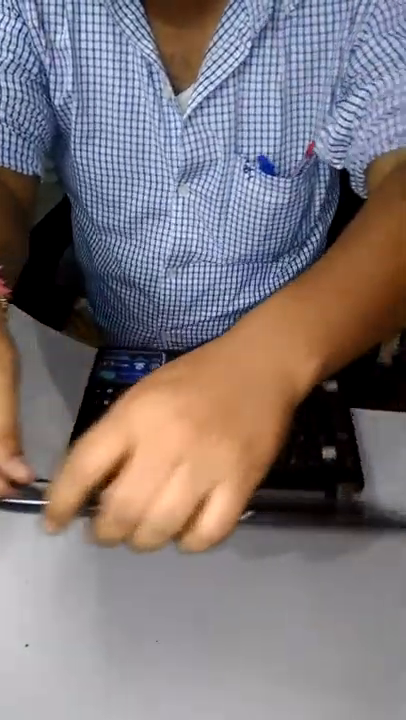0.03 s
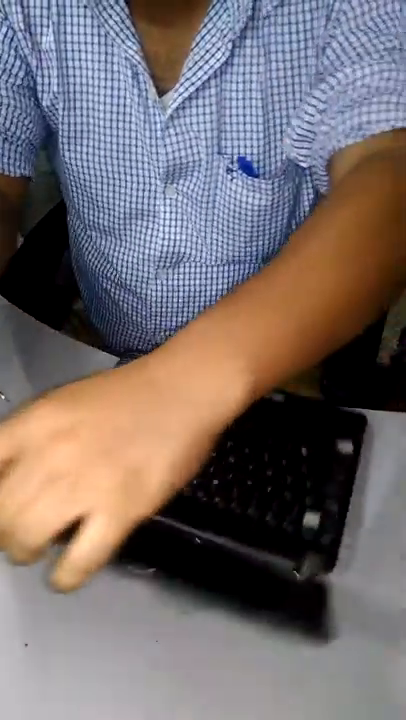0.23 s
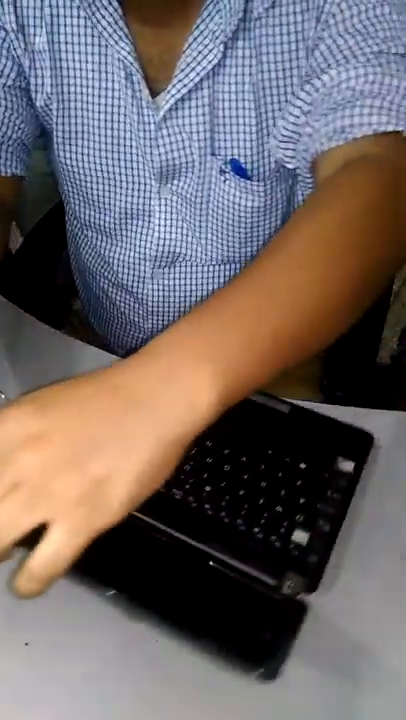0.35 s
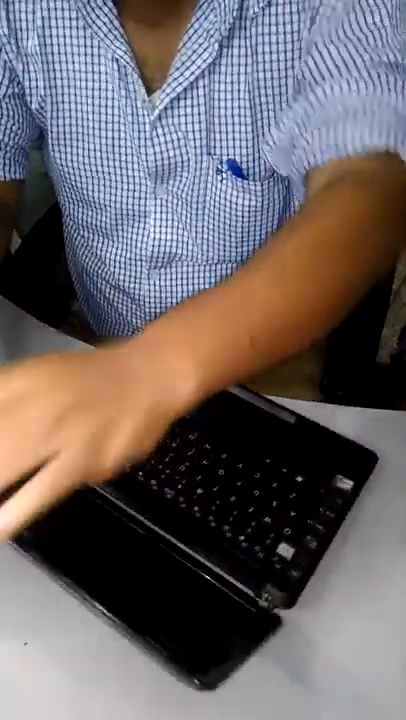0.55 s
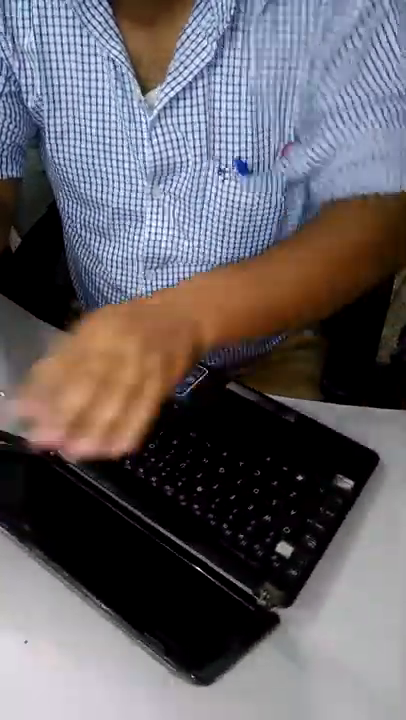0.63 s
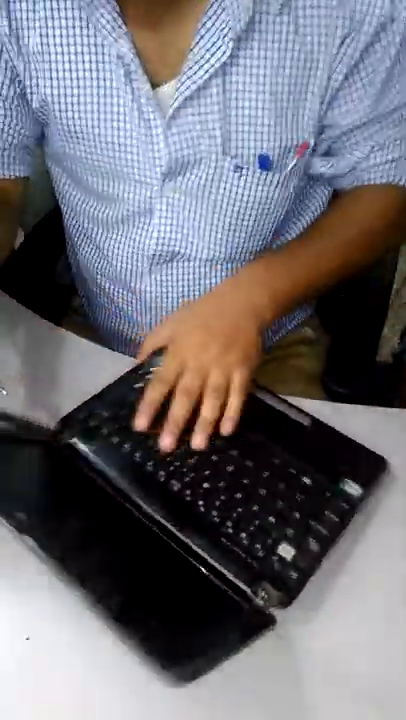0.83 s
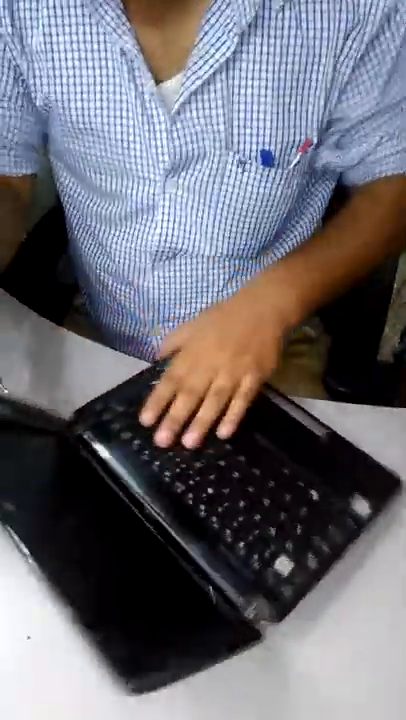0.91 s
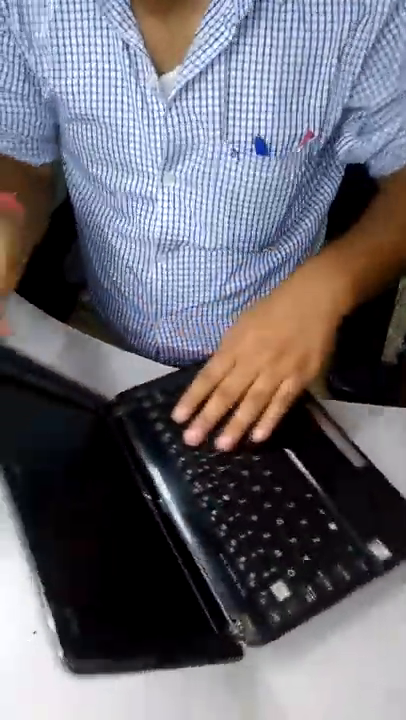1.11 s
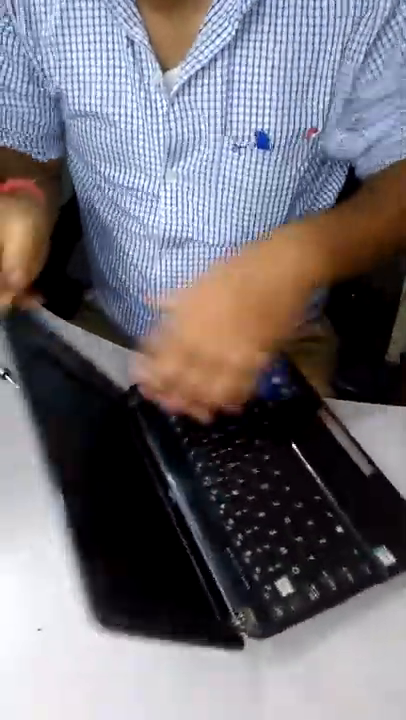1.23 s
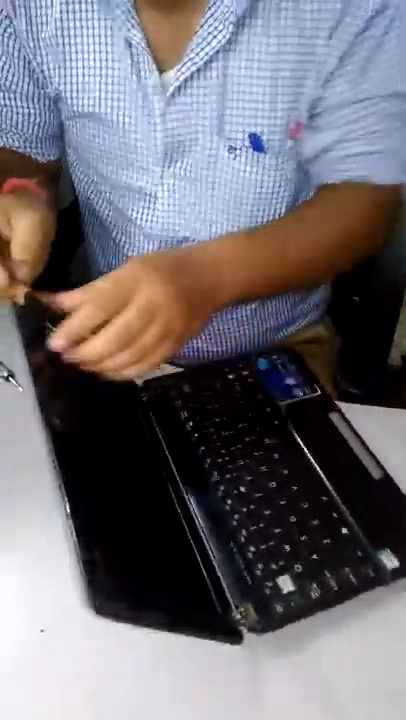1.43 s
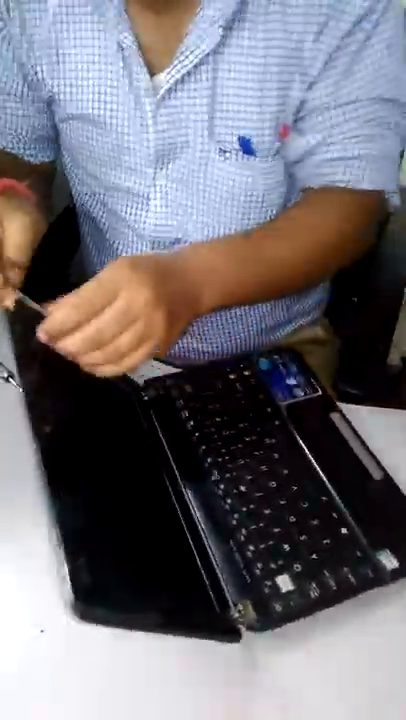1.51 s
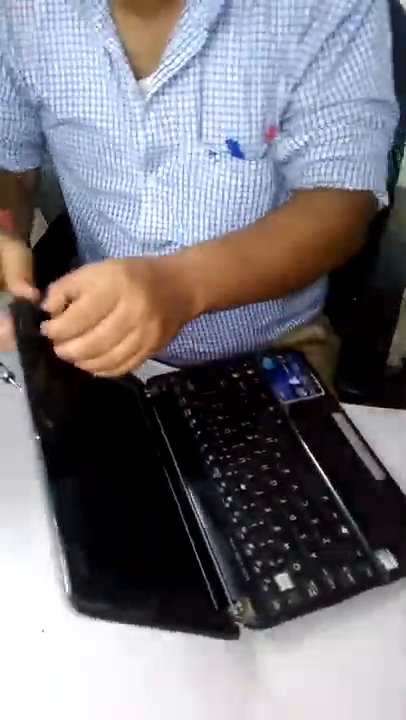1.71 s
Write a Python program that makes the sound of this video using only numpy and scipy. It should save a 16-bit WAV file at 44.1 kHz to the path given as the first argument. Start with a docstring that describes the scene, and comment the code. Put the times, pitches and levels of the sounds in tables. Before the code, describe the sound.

Sharp plastic knocks and soft scraping as a small laptop is shifted on a table.

```python
"""A small laptop is turned on a table, over a low room rumble and a faint hum. Palms rub the lid and brush
the keys, then at 0.28 s the front corner knocks down, rocks and lands again 30 ms later: the plastic case
rings, the keys clatter and the table top booms. The base drags on its rubber feet and bumps softly. From
0.9 s the hand rubs, brushes and ticks on the plastic, and the hinge gives a faint squeak. At 1.38 s the
rear corner knocks and rocks in the same way, and a last drag and brush die away."""
import sys
import numpy as np
from scipy import signal
from scipy.fft import rfft, irfft
from scipy.io import wavfile

SR = 44100
rng = np.random.default_rng(int(sys.argv[2]) if len(sys.argv) > 2 else 0)


def persist_wave(psi):
    """Save psi, clipped to +-1, as 16-bit WAV."""
    counts = np.round(np.clip(psi, -1, 1) * 32767).astype(np.int16)
    wavfile.write(sys.argv[1], SR, np.atleast_2d(counts).T)


N = 77175

# hits of the case on the table: start_s, corner, level_db, cutoff_hz, body_db, clatter_db
KNOCKS = [(0.278, "front", -4.5, 1400, -14, -5), (0.2795, "front", -16, 9950, -5.5, 7),
          (0.2836, "front", -20, 9000, 7.5, 4), (0.3100, "front", -20.5, 3630, 9.5, 6.5),
          (1.377, "rear", -14, 7540, -1, 2), (1.3820, "rear", -20, 6600, 2, 2),
          (1.406, "rear", -18, 3460, -4, 2.5)]
CORNERS = ("front", "rear")
# ring of the plastic case: pitch_hz, t60_s, front_hit_db, rear_hit_db
CASE_MODES = [(754, 0.05, -4.5, -7), (882, .06, -11, -3), (981, .06, -8, 1), (1187, 0.067, 4, -9),
              (1300, 0.065, 0.5, 0.5), (1368, 0.13, -11.5, -12), (1642, 0.05, -10, -31),
              (2090, 0.053, -12, -2), (2444, 0.072, -9, -23), (2458, .07, -22, 0), (2540, 0.055, -10.5, -3),
              (3083, .08, -8, -4.5), (3750, 0.15, -8, -32), (5070, .06, -20, -7)]
# hollow body of the base: pitch_hz, level_db, t60_s
BODY_MODES = [(137.6, 0, 0.085), (194.6, -0.5, 0.077), (270.5, -2, 0.12), (343, -2, 0.096),
              (420.5, -7.5, 0.2)]
# EQ of the clattering keys and panels: frequency_hz, front_hit_db, rear_hit_db
CLATTER_EQ = [(100, 1, -23), (400, -0.5, 4.5), (536, -4.5, -2.5), (820, -0.5, 3.5), (1320, 1.5, -1),
              (1670, -3, -1), (2500, -3.5, -4), (3100, -11.5, 1), (3350, -8, -11), (4050, -14, -8),
              (5500, -19, -11), (6820, -21.5, -15.5), (8500, -30.5, -23), (14000, -27, -19)]
# weight landing on the table: start_s, level_db, push_s
THUMPS = [(0.053, -35, 0.0028), (0.24, -20, 0.0028), (0.28, -14.5, 0.0053), (0.3093, -8.5, 0.0074),
          (0.395, -21.5, 0.0028), (0.534, -16, 0.0054), (0.612, -21, 0.0083), (0.768, -27.5, 0.0034),
          (0.843, -17, 0.0095), (0.986, -28, 0.0022), (1.148, -24, 0.0034), (1.371, -12.5, 0.01),
          (1.402, -19, 0.0099)]
# boom of the table top: pitch_hz, level_db, t60_s
TABLE_MODES = [(66.6, -3, .28), (90.3, -1.5, 0.18), (128.1, -2, 0.18), (182, -20, 0.073)]
# the base dragging on the table: start_s, length_s, level_db, pitch_hz
DRAGS = [(0.322, 0.27, -33.5, 352.7), (0.37, 0.11, -36, 429), (0.485, 0.13, -43, 399),
         (0.495, 0.15, -35, 182), (0.558, 0.23, -40.5, 504.5), (0.717, 0.3, -44, 275),
         (1.059, .14, -41, 344), (1.395, 0.12, -33, 406.5), (1.598, 0.093, -50.5, 503)]
# EQ of the scraping feet: frequency_hz, gain_db
SCRAPE_EQ = [(150, -13), (270, -2.5), (500, 15), (640, -14.5), (1200, -7), (2500, -8), (6000, -25)]
# fingertips and nails on the plastic: start_s, level_db
TICKS = [(0.99, -51), (1.3273, -55)]
# bright EQ of a tick: frequency_hz, gain_db
TICK_EQ = [(1500, -6), (3000, 0), (7000, 1), (10000, -5.5), (14000, -17)]
# hand and sleeve brushing the keys: start_s, length_s, level_db
BRUSHES = [(0.13, 0.42, -56.5), (0.92, 0.071, -57.5), (0.97, 0.094, -59.5), (1.03, 0.12, -62),
           (1.32, 0.068, -56.5), (1.45, .17, -58)]
# papery EQ of the brushing: frequency_hz, gain_db
BRUSH_EQ = [(1500, -7), (3000, 18.5), (5000, -2.5), (8000, 1.5), (11000, -9.5), (14000, -11.5)]
# palms rubbing the lid: start_s, length_s, level_db
RUBS = [(0.001, 0.091, -49), (0.1, 0.23, -47.5), (0.93, 0.3, -56)]
# duller EQ of the rubbing: frequency_hz, gain_db
RUB_EQ = [(300, -5), (900, 2), (1800, 4), (3600, -8.5), (5500, -21), (10000, -35.5)]
# squeak of the hinge: start_s, length_s, level_db
SQUEAKS = [(1.272, 0.051, -51)]
# dark EQ of the room rumble: frequency_hz, gain_db
RUMBLE_EQ = [(20, -28), (35, -9), (55, -6), (115, -1), (200, -9), (350, -11.5), (500, -13), (620, -24.5),
             (850, -22.5), (1010, -17.5), (1250, -27.5), (2100, -30.5), (3100, -39), (4200, -46),
             (5800, -57.5), (9000, -64.5), (14000, -77.5)]

CASE_DB, BODY_DB, CLATTER_DB = -9.5, -5.5, -5.5
CLATTER_T60_S, ATTACK_S, TICK_T60_S = 0.1, 0.00076, 0.046
DRAG_WIDTH_HZ, SLIPS_PER_S, SLIP_CUTOFF_HZ, SCRAPE_DB = 14, 2500, 900, -12.5
SQUEAK_HZ, SQUEAK_WIDTH_HZ = 2735, 66
ROOM_DB, ROOM_T60_LOW_S, ROOM_T60_HIGH_S, ROOM_SPLIT_HZ, ROOM_BUILD_S = -12.5, 0.48, 0.32, 4900, 0.012
RUMBLE_DB, HUM_HZ, HUM_DB = -33, 123.6, -43
BASS_CUT_HZ, TOP_CUT_HZ = 35, 14400


def undb(db):
    """Decibels to gain."""
    return 10 ** (np.asarray(db) / 20)


def clock():
    """Time of every sample in seconds."""
    return np.arange(N) / SR


def equalise(x, eq):
    """Shape a sound with an EQ curve; rms 1."""
    hz, db = np.array(eq, float).T
    bins_hz = np.maximum(np.fft.rfftfreq(N, 1 / SR), 1)
    gain = undb(np.interp(np.log(bins_hz), np.log(hz), db))
    shaped = irfft(rfft(x) * gain, N)
    return shaped / np.std(shaped)


def noise(eq):
    """Noise coloured by an EQ curve; rms 1."""
    return equalise(rng.standard_normal(N), eq)


def lowpass(x, hz):
    """Second-order low-pass."""
    return signal.sosfilt(signal.butter(2, min(hz, SR / 2 - 1), fs=SR, output="sos"), x)


def resonate(x, hz, width_hz):
    """Play a sound through one resonant peak; rms 1."""
    ringing = signal.lfilter(*signal.iirpeak(hz, hz / width_hz, fs=SR), x)
    return ringing / np.std(ringing)


def fade(t60):
    """Exponential decay, 60 dB down after t60 seconds."""
    return np.exp(-np.minimum(np.log(1000) * clock() / max(t60, 1e-3), 60))


def delay(x, start):
    """Move a sound to its start time."""
    return np.concatenate([np.zeros(max(int(start * SR), 0)), x])[:N]


def ring(modes, detune=0):
    """Damped modes of alternating sign; detune is the random pitch spread that the grip adds."""
    out = 0
    for k, (hz, db, t60) in enumerate(modes):
        pitch_hz = hz * (1 + detune * rng.standard_normal())
        out += (-1) ** k * undb(db) * fade(t60) * np.sin(2 * np.pi * pitch_hz * clock())
    return out


def swells(strokes):
    """Envelope of a series of strokes, each rising and falling as an arch."""
    return sum(undb(db) * np.sin(np.pi * np.clip((clock() - start) / length, 0, 1))
               for start, length, db in strokes)


def case_knocks():
    """Each hit rings case and body and shakes the keys at its own brightness; its corner sets the tone."""
    out = 0
    attack = 1 - np.exp(-clock() / ATTACK_S)
    for start, corner, db, cutoff_hz, body_db, clatter_db in KNOCKS:
        side = CORNERS.index(corner)
        case_modes = [(hz, corner_db[side], t60) for hz, t60, *corner_db in CASE_MODES]
        clatter_eq = [(hz, corner_db[side]) for hz, *corner_db in CLATTER_EQ]
        case = undb(CASE_DB) * ring(case_modes, detune=0.0072)
        body = undb(BODY_DB + body_db) * ring(BODY_MODES, detune=0.026)
        clatter = undb(CLATTER_DB + clatter_db) * noise(clatter_eq) * fade(CLATTER_T60_S)
        hit = lowpass((case + body + clatter) * attack, cutoff_hz)
        out += undb(db) * delay(hit, start)
    return out


def table_thumps():
    """Short pushes through the rubber feet set the table top booming."""
    out = 0
    table_ring = ring(TABLE_MODES)
    for start, db, length in THUMPS:
        push = np.sin(np.pi * np.clip(clock() / length, 0, 1)) ** 2
        boom = signal.fftconvolve(push / push.sum(), table_ring)[:N]
        out += undb(db) * delay(boom, start)
    return out


def base_drags():
    """Dense soft slips of the rubber feet scrape and ring the base, at a new pitch with each push."""
    out = 0
    for start, length, db, hz in DRAGS:
        slipping = rng.random(N) < SLIPS_PER_S / SR
        slips = lowpass(slipping * rng.standard_normal(N), SLIP_CUTOFF_HZ)
        groan = resonate(slips, hz, DRAG_WIDTH_HZ)
        scrape = undb(SCRAPE_DB) * equalise(slips, SCRAPE_EQ)
        out += swells([(start, length, db)]) * (groan + scrape)
    return out


def hand():
    """Light ticks and soft brushing on the keys, duller rubbing on the lid."""
    ticks = sum(undb(db) * delay(noise(TICK_EQ) * fade(TICK_T60_S), start) for start, db in TICKS)
    brushing = swells(BRUSHES) * noise(BRUSH_EQ)
    rubbing = swells(RUBS) * noise(RUB_EQ)
    return ticks + brushing + rubbing


def hinge_squeak():
    """A faint narrow squeak as the lid is pulled."""
    return swells(SQUEAKS) * resonate(rng.standard_normal(N), SQUEAK_HZ, SQUEAK_WIDTH_HZ)


def room_reverb(x):
    """Diffuse tail of a small room; the treble dies sooner."""
    white = rng.standard_normal(N)
    lows = lowpass(white, ROOM_SPLIT_HZ)
    build_up = 1 - np.exp(-clock() / ROOM_BUILD_S)
    tail = (lows * fade(ROOM_T60_LOW_S) + (white - lows) * fade(ROOM_T60_HIGH_S)) * build_up
    return undb(ROOM_DB) * signal.fftconvolve(x, tail / np.linalg.norm(tail))[:N]


def room_tone():
    """A bed of steady rumble with a wavering low hum."""
    waver = lowpass(rng.standard_normal(N), hz=4.2)
    hum = np.sqrt(2) * np.sin(2 * np.pi * HUM_HZ * clock() + 0.42 * waver / np.std(waver))
    return undb(RUMBLE_DB) * noise(RUMBLE_EQ) + undb(HUM_DB) * hum


def scene():
    """Mono mix: knocks, hand and hinge feed the reverb; the low layers stay dry."""
    bright = case_knocks() + hand() + hinge_squeak()
    return (bright + room_reverb(bright) + table_thumps() + base_drags() + room_tone())[None]


def record(dry):
    """Roll off the deepest bass and cut the very top steeply."""
    thinned = signal.sosfilt(signal.butter(2, BASS_CUT_HZ, "high", fs=SR, output="sos"), dry)
    return signal.sosfilt(signal.ellip(8, .2, 70, TOP_CUT_HZ, fs=SR, output="sos"), thinned)


dry = scene()
out = record(dry)
persist_wave(out)
```